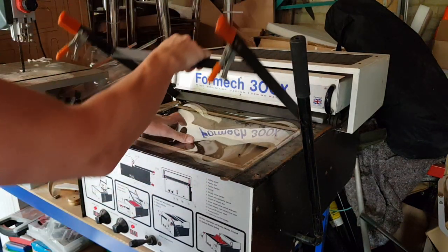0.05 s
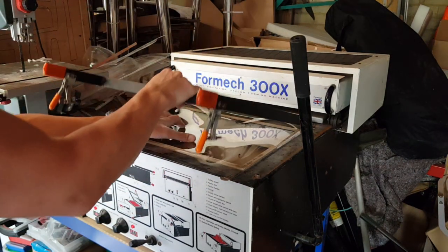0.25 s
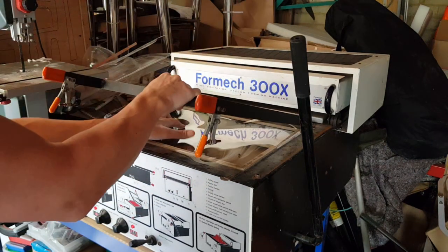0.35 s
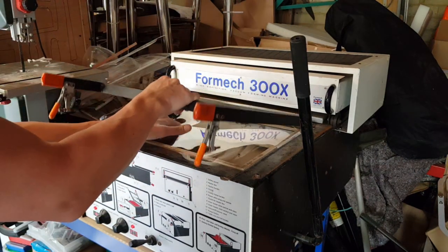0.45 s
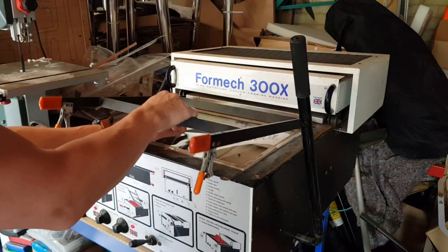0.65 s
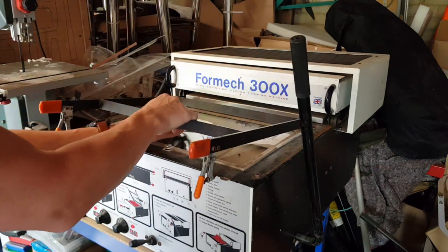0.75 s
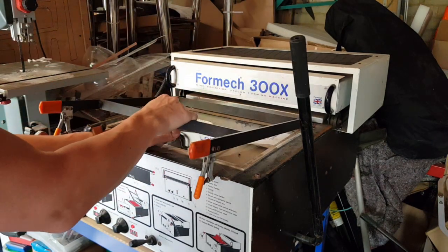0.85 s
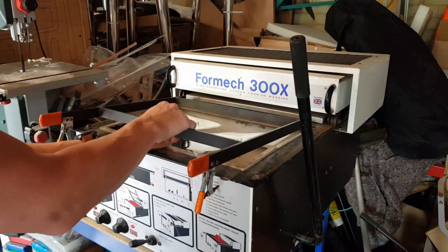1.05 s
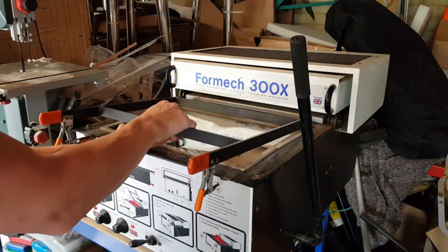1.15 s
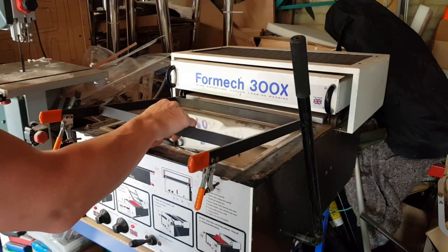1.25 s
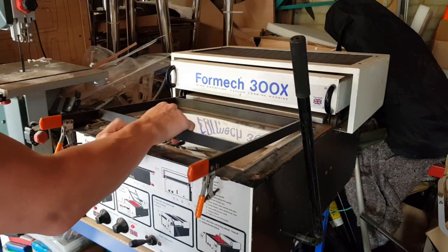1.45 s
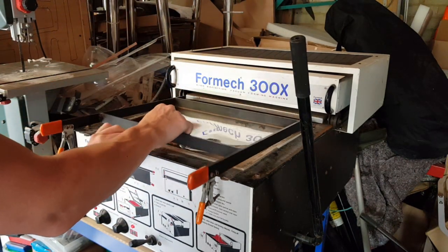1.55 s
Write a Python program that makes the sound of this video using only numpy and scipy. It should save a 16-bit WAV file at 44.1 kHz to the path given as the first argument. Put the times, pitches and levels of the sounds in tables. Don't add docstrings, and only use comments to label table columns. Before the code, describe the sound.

Steel frame clatters down on a machine cabinet, chattering and jingling; dull hand bumps and faint scraping follow, then a sharp toggle clamp click with lid thuds, heard close in stereo in a small room with light hiss.

```python
import sys
import numpy as np
from scipy import signal
from scipy.io import wavfile
from scipy.ndimage import uniform_filter1d

SR = 44100
rng = np.random.default_rng(int(sys.argv[2]) if len(sys.argv) > 2 else 0)


def digitize_waveform(pressure):
    field = np.atleast_2d(pressure).T
    bounded = np.clip(field, -1, 1)
    quanta = np.round(bounded * 32767).astype(np.int16)
    wavfile.write(sys.argv[1], SR, quanta)


def rack_gain(trim_db):
    fader = np.asarray(trim_db, float)
    return 10 ** (fader / 20)


N = 70560
T = np.arange(N) / SR

# (frequency [Hz], left-right likeness [0-1])
WASH_LIKENESS = [(60, 0.69), (180, 0.99), (550, 0.72), (1650, 0.048), (5000, 0.027), (15000, 0.72)]


def read(points, hz):
    f, value = np.transpose(points)
    return np.interp(np.log(hz + 1), np.log(f + 1), value)


def unit(x):
    return x / np.sqrt(np.mean(x ** 2) + 1e-20)


def noise(colour, likeness, length, life=2400.0):
    # (frequency [Hz], t60 [s])
    shop_t60 = [(100, 0.41), (500, 1), (1100, 0.45), (2500, 0.43), (5000, 0.23), (10000, 0.2),
                (16000, 0.19)]
    # (frequency [Hz], left minus right [dB])
    lean = [(60, 3.5), (180, 0), (550, 3), (1650, 4.5), (4500, -0.5), (8000, -0.5), (15000, 2.5)]
    echo_db, echo_life = -20, 2.29
    echo_t60 = echo_life
    hop = 128
    hz = np.fft.rfftfreq(512, 1 / SR)
    a, b, c, d = rng.standard_normal((length // hop + 5, 257, 4)).T
    shared = np.clip(read(likeness, hz), -1, 1)[:, None]
    left = a + 1j * b
    right = shared * left + np.sqrt(1 - shared ** 2) * (c + 1j * d)
    z = np.array([left, right]) * rack_gain(read(colour, hz))[:, None]
    z *= rack_gain(np.array([[.5], [-.5]]) * read(lean, hz))[:, :, None]
    fall_db = -60 * np.arange(a.shape[1]) * hop / SR / (life * read(shop_t60, hz))[:, None]
    z *= np.hypot(rack_gain(fall_db), rack_gain(echo_db + fall_db / echo_t60))
    return unit(signal.istft(z, nperseg=512, noverlap=512 - hop)[1][:, :length])


def ring(modes, spread, life=1.):
    t = T[:30000, None]
    hz, db, t60 = np.transpose(modes)
    shift = spread * rng.standard_normal((2, 1, len(hz))) * np.minimum(hz / 1500, 1)
    decay = rack_gain(db - 60 * t / np.minimum(t60 * life, 1.))
    x = (decay * np.sin(2 * np.pi * hz * t + shift)).sum(2)
    return x / np.abs(x[:, :800]).max()


def tail(colour, life, rise_ms):
    x = noise(colour, WASH_LIKENESS, 24000, life)
    rise = 1 - np.exp(-T[:24000] * 1000 / rise_ms)
    return x / np.std(x[:, :600]) * rise


def push(s, db, contact_ms):
    u = (T - s) * 1000 / max(contact_ms, .05)
    force = np.where((u > 0) & (u < 1), np.sin(np.pi * np.clip(u, 0, 1)) ** 2, 0)
    return rack_gain(db) * force / (force.sum() + 1e-9)


def strike(force, body):
    return signal.fftconvolve(force[None], body, axes=1)[:, :N]


def panels(soft):
    panel_hz = [76, 127, 144, 193, 209, 224, 275, 318, 382, 436, 488, 537, 549, 581]
    # (level under a hard blow [dB], level under a soft push [dB], t60 [s])
    panel_rows = [(-8, -0.5, 0.58), (-16, -29, 0.77), (-20, -8, 0.59), (-13, -13.5, 0.73), (1, -6.5, 0.6),
                  (1, -8.5, 0.4), (-20, -4, 0.54), (-27.5, -3.5, 0.21), (-9, -18, 0.55), (-7, -10.5, 0.23),
                  (-3.5, -31, 1), (6, -12.5, 0.49), (0, -25, 0.41), (0.5, -12, 0.49)]
    # (frequency [Hz], level [dB], t60 [s])
    thud = [(221.4, 17.5, 0.035), (361, 9, 0.027)]
    thin_hz, thin_t60 = 500, .3
    modes = []
    for hz, (blow_db, push_db, t60) in zip(panel_hz, panel_rows):
        if hz > thin_hz:
            t60 = min(t60, thin_t60)
        modes.append((hz, push_db if soft else blow_db, t60))
    if soft:
        modes = modes + list(thud)
    return ring(modes, 0.19) * rack_gain(np.array([[.9], [-.9]]))


def frame():
    # (time [s], force [dB], contact [ms], jingle [dB])
    blows = [
        (.209, -26.5, 0.11, -35.5),
        (.218, -21.5, 0.14, -32.5),
        (0.223, -15.5, 0.54, -35.5),
        (.243, -24, 0.12, -38.5),
        (0.265, -28, 0.38, -39.5),
        (.285, -22.5, 0.92, -65),
        (.299, -23.5, 0.13, -40),
        (.311, -28, 0.32, -35.5),
        (0.329, -39.5, 0.95, -59),
        (0.347, -63, 0.078, -46),
    ]
    # (frequency [Hz], level [dB], t60 [s])
    frame_modes = [(634, -7, .45), (834, -11, .45), (1033, -11, .4), (1172, -9, .25), (1268, -7, .3),
                   (2020, -10, .4), (2358, -12, .35), (2616, -9, .4), (2946, -12, .4)]
    # (frequency [Hz], level [dB per Hz])
    crash = [(60, -48), (200, -24), (500, -20), (750, -18), (1250, -13), (1600, -19), (2600, -13),
             (6000, -23)]
    # (frequency [Hz], level [dB per Hz])
    jingle = [(3000, -1.5), (6000, 0.5), (8500, -13), (11000, -2), (16000, -7)]
    cabinet_db, frame_db, crash_db = 2.1, -2, -3
    body = rack_gain(cabinet_db) * panels(soft=False) + rack_gain(frame_db) * ring(frame_modes, 1.0, 0.35)
    out = strike(push(.2985, -24.5, .1), ring(frame_modes[5:], 0.31, 0.53))
    for s, db, contact_ms, jingle_db in blows:
        force = push(s, db, contact_ms)
        out = out + strike(force, body)
        out = out + strike(force, rack_gain(crash_db) * tail(crash, 0.85, 0.94))
        out = out + strike(push(s, jingle_db, 0.083), tail(jingle, 1.0, 6.4))
    return out


def bumps():
    # (time [s], force [dB], contact [ms], rasp [dB])
    pushes = [(0.074, -53, 1.1, -19), (0.143, -35, 2.25, -25.5), (.515, -71, 0.96, -24),
              (0.556, -35.5, 2.2, -51), (.684, -33, 1.6, -20.5), (.694, -32, 1.3, -30),
              (0.705, -24, 1.05, -36), (0.7101, -26.5, 2.2, -28), (0.717, -27.5, 2.5, -25.5),
              (0.7309, -31.5, 3.4, -49), (0.752, -35, 1.6, -33), (.842, -52, 4.4, -8.5),
              (0.869, -39, 2.2, -20.5), (0.897, -40.5, 2.5, -23), (.987, -19, 2.4, -35),
              (1.0001, -22.5, 2.5, -29), (1.01, -50, 2.3, -26.5), (1.02, -43, 3.2, -7.5),
              (1.122, -52.5, 1.1, -0.5), (1.163, -31, 0.93, -13), (1.189, -24, 0.61, -11),
              (1.226, -34, 0.61, -15), (1.3, -29.5, 5.1, -22), (1.357, -38.5, 0.51, -35),
              (1.408, -40.5, 1.5, -8.5), (1.45, -46, 1.3, -14), (1.499, -45.5, 3.4, -11.5),
              (1.55, -54, 2.7, -5)]
    # (time [s], level [dB])
    drag_points = [(0, -50), (.19, -67), (.5, -46.5), (.6, -58.5), (.82, -57.5), (.9, -40), (1.1, -80),
                   (1.3, -45), (1.6, -68.5)]
    # (frequency [Hz], level [dB per Hz])
    rasp = [(300, -16.5), (700, -10), (2200, -17), (3200, -22), (4500, -12.5), (7000, -36), (10000, -14.5),
            (16000, -13.5)]
    # (time [s], force [dB])
    ticks = [
        (0.559, -63),
        (0.679, -51.5),
        (.707, -47.5),
        (0.726, -64),
        (0.989, -50.5),
        (1.004, -62),
        (1.012, -49.5),
        (1.407, -68),
        (1.449, -60),
    ]
    drag_db = np.interp(T, *np.transpose(drag_points))
    rumble = unit(uniform_filter1d(rng.standard_normal(N), size=90))
    force = rumble * rack_gain(drag_db - 32) + sum(push(s, db, contact_ms) for s, db, contact_ms, _ in pushes)
    out = -strike(force, panels(soft=True))
    rasps = [tail(rasp, 0.51, 6.3) for _ in range(3)]
    for k, (s, db, _, rasp_db) in enumerate(pushes):
        out = out + strike(push(s, db + rasp_db, 0.11), rasps[k % 3])
    scrape = rack_gain(drag_db - 36) * noise(rasp, WASH_LIKENESS, N)
    tick_body = tail([(800, 13.5), (5000, -4.5), (14000, 10.0)], 0.083, 0.85)
    return out + scrape + strike(sum(push(s, db, 0.15) for s, db in ticks), tick_body)


def clamp():
    # (time [s], force [dB])
    snaps = [
        (1.15, -45.5),
        (1.1547, -22.5),
        (1.16, -24.5),
        (1.169, -47),
    ]
    # (frequency [Hz], level [dB], t60 [s])
    clamp_modes = [(1256, -27, .3), (3919, -12, .14), (5335, -16, .11), (5744, -9, .2), (6500, -5, .08),
                   (7024, -9, .2), (3300, -19, .18), (7845, -6, .12), (9152, -9, .14), (10870, -8, .09)]
    # (frequency [Hz], level [dB per Hz])
    chink = [(200, -29), (400, -5), (697, -35), (865, -17), (1230, -11.5), (2150, -16), (7060, -2),
             (16000, -16.5)]
    clamp_db, room_db, chink_db = 4.5, 8.5, -2.5
    body = rack_gain(clamp_db) * ring(clamp_modes, 1.58, 0.99)[:, :24000]
    room = tail([(500, 6), (16000, -22)], 1.0, 2.3)
    room = room / np.linalg.norm(room[0])
    body = body + rack_gain(room_db) * signal.fftconvolve(body, room, axes=1)[:, :24000]
    out = 0
    for s, db in snaps:
        out = out + strike(push(s, db, 0.078), body + rack_gain(chink_db) * tail(chink, 1.0, 0.21))
    return out


def lid():
    # (time [s], force [dB], contact [ms])
    jolts = [
        (.306, -32, 0.93),
        (.35, -36, 2.5),
        (0.524, -36, 5.5),
        (1.1592, -30.5, 2.3),
        (1.1696, -26.5, 1.24),
        (1.1851, -25, 2),
        (1.203, -28, 1.3),
        (1.2261, -41, 2.1),
    ]
    # (frequency [Hz], level [dB], t60 [s])
    lid_modes = [(205.6, -3.5, .3), (227, -1.5, 0.36), (284, -2.5, 0.22), (535, -3, 0.23)]
    # (frequency [Hz], level [dB per Hz])
    brush = [(1500, -12), (4000, 0), (8000, -5), (12000, -5), (16000, -18)]
    # (time [s], level [dB])
    sleeve = [(1.0, -102), (1.05, -73), (1.12, -88), (1.43, -90), (1.455, -69), (1.6, -72)]
    boom = strike(sum(push(*jolt) for jolt in jolts), ring(lid_modes, 0.26))
    return boom + rack_gain(np.interp(T, *np.transpose(sleeve))) * noise(brush, WASH_LIKENESS, N)


def bench():
    # (time [s], force [dB])
    shudders = [
        (.216, -53),
        (0.704, -44),
        (0.728, -56),
        (.99, -57),
    ]
    # (frequency [Hz], level [dB], t60 [s])
    bench_modes = [(52, 0, 0.44), (75.5, 2, .35)]
    return strike(sum(push(s, db, 5.6) for s, db in shudders), ring(bench_modes, 0.26))


def bar():
    # (time [s], level [dB])
    rub = [(.45, -86), (.54, -67), (.62, -61.5), (.70, -60), (.83, -68), (.93, -75), (.97, -82),
           (1.09, -73), (1.13, -60), (1.22, -76)]
    bar_hz, waver_hz, flutter_db = 1189, 2.5, 2.2
    drift = uniform_filter1d(rng.standard_normal((2, N)), size=250)
    drift = unit(uniform_filter1d(drift, size=250))
    tone = np.sin(2 * np.pi * np.cumsum(bar_hz + waver_hz * drift[0]) / SR)
    level = rack_gain(np.interp(T, *np.transpose(rub)) + flutter_db * drift[1])
    return np.sqrt(2) * level * tone * rack_gain(np.array([[1.5], [-1.5]]))


def shop(x):
    wet_db = -12
    room = tail([(20, 2), (1000, -13.0), (16000, -14.5)], 0.27, 9.5)
    return x + rack_gain(wet_db) * strike(x.mean(0), room / np.linalg.norm(room[0]))


def hum_and_hiss():
    # (frequency [Hz], level [dB per Hz])
    hum = [(15, -48), (25, -52), (205, 1), (296, -15), (544, -9.5), (1070, -34), (1170, -32.5), (1300, -19),
           (1600, -40), (2080, -76), (3520, -120)]
    # (frequency [Hz], level [dB per Hz])
    hiss = [(820, -19), (1400, -4.5), (1760, -11), (2070, -1.5), (2820, -12.5), (4520, -6), (8450, -22),
            (13200, -7), (16300, -14.5)]
    # (frequency [Hz], left-right likeness [0-1])
    likeness = [(60, 0.42), (240, 1), (950, 0.1), (3770, 0.017), (15000, 1)]
    hum_db, hiss_db = -56.5, -69
    return rack_gain(hum_db) * noise(hum, likeness, N) + rack_gain(hiss_db) * noise(hiss, likeness, N)


def scene():
    radiate_hz = 100.3
    no_bass = signal.butter(3, radiate_hz, "high", fs=SR, output="sos")
    cabinet = signal.sosfilt(no_bass, frame() + bumps())
    return shop(cabinet) + clamp() + lid() + bench() + bar() + hum_and_hiss()


def low_pass(x):
    return signal.sosfilt(signal.butter(12, 16470, fs=SR, output="sos"), x)


def record(dry):
    edge_hz = 16150
    edge = signal.firwin(255, edge_hz, window=("kaiser", 8), fs=SR)
    mix = signal.oaconvolve(dry, edge[None], "same")
    return low_pass(mix)


dry = scene()
out = record(dry)
digitize_waveform(out)
```